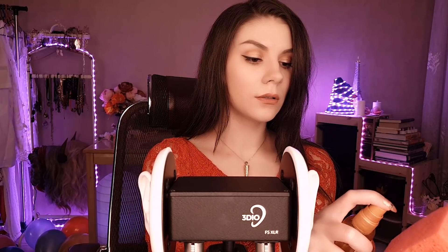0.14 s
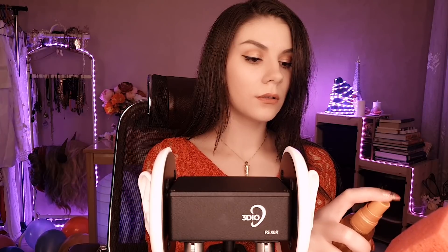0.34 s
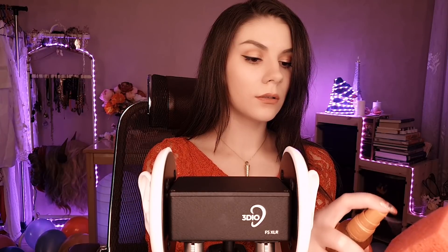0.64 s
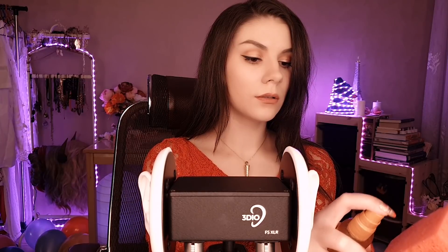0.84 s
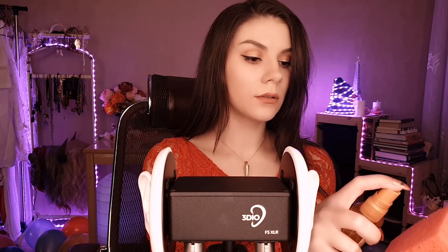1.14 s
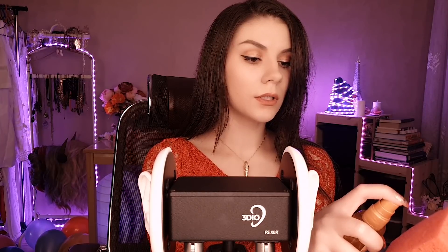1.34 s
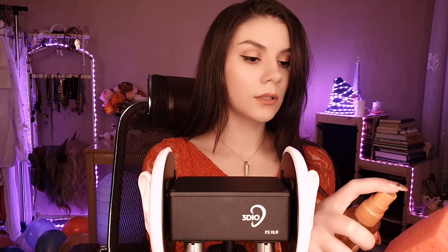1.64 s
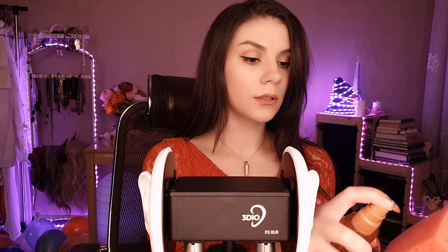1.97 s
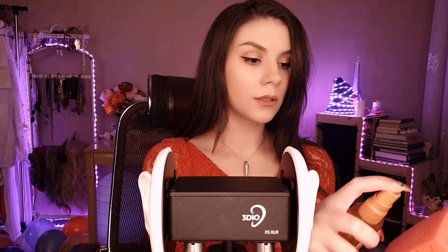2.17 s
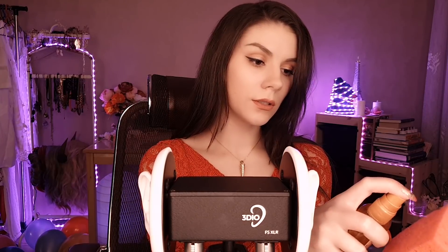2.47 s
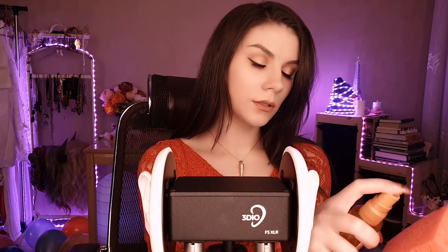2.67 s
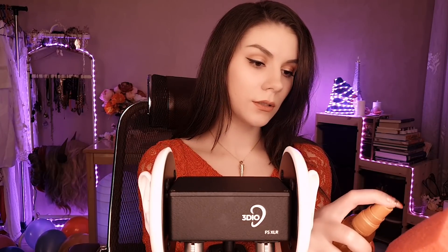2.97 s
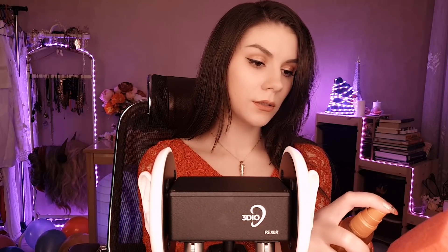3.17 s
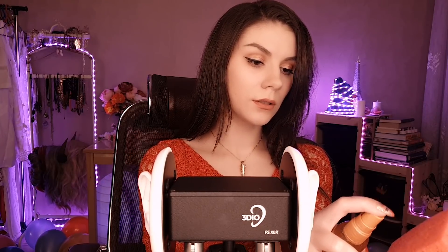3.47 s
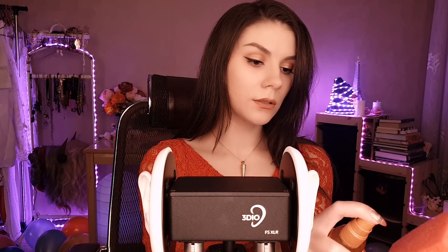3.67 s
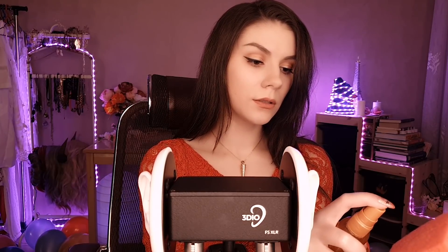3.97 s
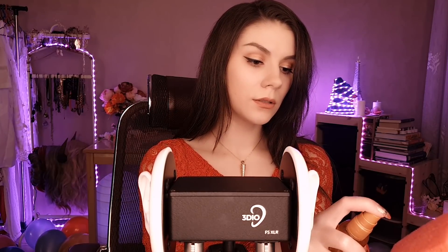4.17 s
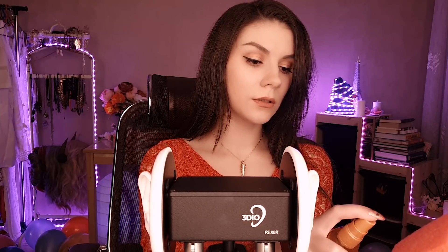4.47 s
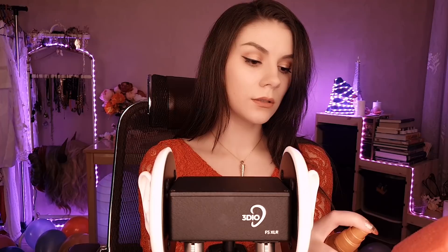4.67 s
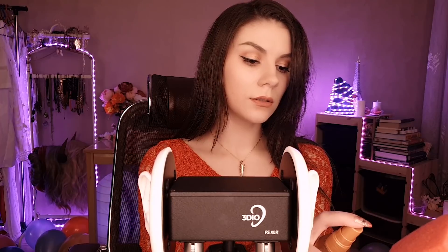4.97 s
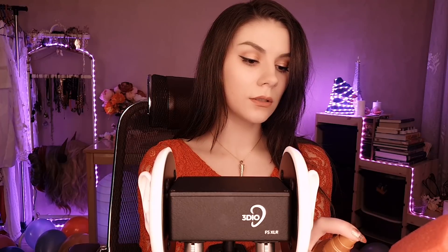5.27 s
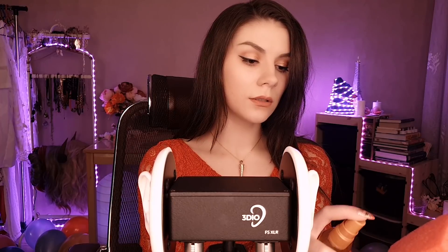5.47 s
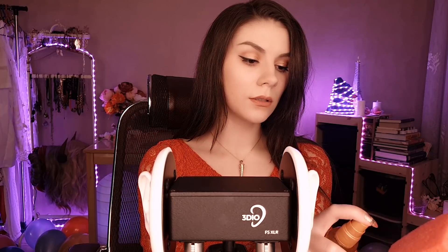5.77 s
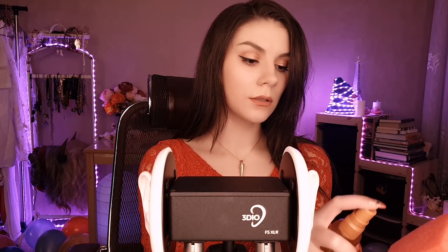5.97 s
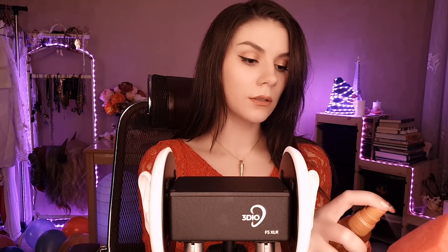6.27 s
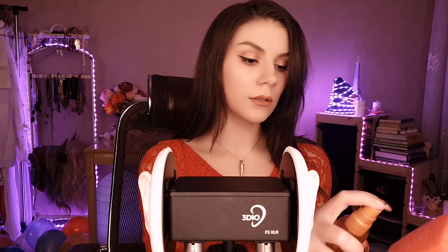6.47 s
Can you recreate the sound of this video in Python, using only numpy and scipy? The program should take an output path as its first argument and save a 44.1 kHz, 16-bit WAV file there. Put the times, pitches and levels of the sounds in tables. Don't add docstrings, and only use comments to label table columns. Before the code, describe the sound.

A small plastic pump sprayer is pressed twelve times, very close to the right ear of a binaural microphone. Each press gives a soft thud and a short bright hiss, then a rising wet squelch as the pump refills, usually ending in a hollow knock. Small clicks and creaks fill the gaps. The left ear gets it fainter and duller, over low house rumble and hum in a furnished room.

```python
import sys
import numpy as np
from scipy import signal
from scipy.fft import rfft, irfft, next_fast_len
from scipy.io import wavfile
from scipy.ndimage import uniform_filter1d, map_coordinates

SR = 44100
rng = np.random.default_rng(int(sys.argv[2]) if len(sys.argv) > 2 else 0)


def decibels_to_gain(level_db):
    exponent = np.asarray(level_db, float) / 20
    return 10 ** exponent


def log_audio(samples):
    frames = np.atleast_2d(samples).T
    limited = np.clip(frames, -1, 1)
    pcm = np.round(limited * 32767).astype(np.int16)
    wavfile.write(sys.argv[1], SR, pcm)


N = 291942


def unit(x):
    return x / np.sqrt(np.mean(x ** 2) + 1e-20)


def along(points, hz):
    point_hz, value = np.transpose(points)
    return np.interp(np.log(hz + 1), np.log(point_hz + 1), value)


def envelopes(tables):
    t = np.arange(N) / SR
    s, db, *others = np.transpose(np.vstack(tables))
    gate = sum((t > rows[0][0]) & (t < rows[-1][0]) for rows in tables)
    gain = uniform_filter1d(1. * gate, size=60) * decibels_to_gain(np.interp(t, s, db))
    return [gain] + [np.interp(t, s, column) for column in others]


def wobble(rate):
    knots = rng.standard_normal(int(N * 1000 / SR) + 4)
    return map_coordinates(knots, [np.arange(N) * rate / SR])


def filtered(x, response):
    m = next_fast_len(N + 8192)
    return irfft(rfft(x, m) * response(np.fft.rfftfreq(m, 1 / SR)), m)[..., :N]


def hiss(spectrum):
    return unit(filtered(rng.standard_normal(N), lambda hz: decibels_to_gain(along(spectrum, hz))))


def strike(out, s, db, modes, attack_s, detune):
    longest_s = max(t60 for _, _, t60 in modes)
    t = np.arange(round(SR * min(1 / 3, 1.5 * longest_s))) / SR
    luck = rng.standard_normal((len(modes), 2)) * [1.8, min(detune, .045)]
    ring = np.zeros(len(t))
    for (hz, level_db, t60), (extra_db, off_pitch) in zip(modes, luck):
        fade = decibels_to_gain(level_db + extra_db - 60 * t / t60)
        ring += fade * np.sin(2 * np.pi * hz * (1 + off_pitch) * t)
    out[round(s * SR):][:len(t)] -= decibels_to_gain(db) * ring * (1 - np.exp(-2 * t / attack_s)) ** 2


def chamber(hz, width_hz):
    slow = filtered(rng.standard_normal((2, N)), lambda f: 1 / (1 + (f / width_hz) ** 2))
    turn = 2 * np.pi * np.cumsum(hz) / SR
    return unit(slow[0] * np.cos(turn) + slow[1] * np.sin(turn))


# valve_opens_s, length_s, jet_db, give_way_thud_db, bottoming_thud_db
DOWNSTROKES = [(0.076, .055, -31.5, -35.5, -36), (0.645, 0.051, -31.5, -34, -31.5),
               (1.247, .05, -31.5, -36, -36), (1.842, 0.053, -31.5, -28.5, -30),
               (2.421, 0.049, -32, -34.5, -35), (2.991, 0.051, -32, -30.5, -34.5),
               (3.536, .05, -31, -30, -30), (4.061, 0.051, -33.5, -34.5, -35),
               (4.601, 0.05, -33.5, -33, -34.5), (5.156, 0.048, -32.5, -31.5, -30.5),
               (5.696, 0.051, -33, -31, -34), (6.252, 0.047, -32.5, -34.5, -34.5)]
# pitch_hz, level_db (per Hz)
MIST_COLOUR = [(180, -29), (300, -20.5), (842, -17), (1390, -13.5), (2070, -3.5), (2520, -7), (3080, -8),
               (3580, -6), (4830, -1.5), (6620, -8), (8640, -15), (10700, -12.5), (13800, -22),
               (15000, -23), (16000, -29)]


def jet():
    attack_s, release_s = 0.0031, 0.0058
    from_db, swell_db, to_db = -8.5, 1.5, -10.5
    gain, = envelopes([[(s, db + from_db), (s + attack_s, db - swell_db), (s + long, db),
                        (s + long + release_s, db + to_db)] for s, long, db, *_ in DOWNSTROKES])
    flutter = decibels_to_gain(.6 * wobble(300))
    return decibels_to_gain(5.5) * gain * unit(flutter * hiss(MIST_COLOUR))


def bleed():
    start_db, length_s, fade_db, top_hz = -24, 0.23, -20, 8000
    gain, = envelopes([[(s + long, db + start_db), (s + long + length_s, db + start_db + fade_db)]
                       for s, long, db, *_ in DOWNSTROKES])
    return decibels_to_gain(5.5) * gain * filtered(hiss(MIST_COLOUR), lambda hz: 1 / (1 + (hz / top_hz) ** 2))


# start_s, length_s, loudest_after_s, level_db, last_chamber_hz
RETURNS = [(0.29, 0.065, 0.031, -39, 3250), (0.86, 0.05, 0.054, -35.5, 3000),
           (1.469, 0.071, 0.038, -39.5, 3000), (2.066, 0.083, 0.026, -41.5, 2650),
           (2.641, 0.058, 0.03, -38, 3200), (3.204, 0.07, .035, -41.5, 2800),
           (3.745, 0.062, 0.043, -38.5, 3300), (4.274, 0.062, 0.032, -41, 3100),
           (4.806, .068, 0.041, -42, 3100), (5.358, 0.059, 0.037, -37.5, 3250),
           (5.9, 0.059, .036, -40.5, 3100), (6.463, 0.069, 0.04, -42, 2900)]
# pitch_hz, level_db (per Hz)
FIZZ_COLOUR = [(300, -24.5), (900, -0.5), (1300, -8.5), (2000, 4.5), (3700, -20.5), (5000, 2),
               (6500, -10.5), (8300, -24.5), (10000, -12.5), (12000, -30.5), (16000, -35)]


def suction():
    empty_hz, attack_s, from_db = 2180, .008, -39
    rise_db_per_s, fade_db_per_s = 193, 399
    fizz_db, fizz_follows = -4.5, 0.73
    tables = []
    hz = np.full(N, 1. * empty_hz)
    for s, long, top, db, last_hz in RETURNS:
        shape = [(-attack_s, from_db), (0, -rise_db_per_s * top), (top, 0),
                 (long, -fade_db_per_s * (long - top))]
        tables.append([(s + after_s, db + swell, swell) for after_s, swell in shape])
        a, b = round((s - attack_s) * SR), round((s + long) * SR)
        hz[a:b] += (last_hz - empty_hz) * np.linspace(0, 1, b - a) ** 2.0
    gain, swell_db = envelopes(tables)
    gurgle = wobble(260)
    wide = .3 * decibels_to_gain(2 * gurgle) * chamber(hz, width_hz=400)
    core = unit(decibels_to_gain(2.2 * gurgle) * (chamber(hz, width_hz=160) + wide))
    fizz = unit(decibels_to_gain(1.5 * gurgle + 2.5 * wobble(400)) * hiss(FIZZ_COLOUR))
    fizz_gain = decibels_to_gain(fizz_db + (fizz_follows - 1) * np.maximum(swell_db, -15))
    return decibels_to_gain(2) * gain * (core + fizz_gain * fizz)


OPENING_SLUGS = [-45, -29.5, -35.5, -30, -35.5, -37, -34.5, -38.5, -39, -43, -56, -37.5]
# start_s, peak_db, bubble_db (above the peak)
LATER_SLUGS = [(0.296, -31.5, -24), (0.3069, -33.5, -14), (0.3208, -36, -12), (0.337, -31.5, -7.5),
               (0.8753, -24.5, -13.5), (0.8878, -29.5, -10.5), (1.487, -31, -13), (2.0826, -28.5, -12),
               (2.098, -39, -13), (2.6577, -29.5, -10.5), (2.6804, -25.5, -11), (3.22, -31, -11),
               (3.264, -43, -4.5), (3.761, -28, -13), (4.298, -45, -4), (4.8183, -41, -25),
               (5.3708, -45, -5), (5.913, -39, -15), (6.4808, -33.5, -8)]
# pitch_hz, level_db, t60_s
BUBBLE_MODES = [(1010, 5, 0.014), (780, -11.5, 0.04)]
# pitch_hz, level_db, t60_s
BALL_MODES = [(4340, 3.5, 0.0029), (5200, -2, 0.0084), (5960, -10, 0.0041), (7900, -10, 0.0021),
              (9800, -20, 0.0016)]


def slugs():
    first_lag_s, first_bubble_db, ball_db = 0.0015, -31.5, 5
    swell, out, t = np.zeros(N), np.zeros(N + SR), np.arange(-200, 200) / SR
    first = [(s + first_lag_s, db, first_bubble_db) for (s, *_), db in zip(RETURNS, OPENING_SLUGS)]
    for s, db, bubble_db in first + list(LATER_SLUGS):
        i = round((s + 0.0016) * SR)
        swell[i - 200:i + 200] += decibels_to_gain(db) * np.exp(-.5 * (t / .0013) ** 2)
        strike(out, s + 0.0011, db + bubble_db + 11.5, BUBBLE_MODES, attack_s=0.002, detune=0.051)
        wet_ball = np.array(BALL_MODES) * [1, 1, .7]
        strike(out, s, db + ball_db, wet_ball, attack_s=0.0015, detune=0.045)
    return decibels_to_gain(-3.0) * swell * hiss(FIZZ_COLOUR) + out[:N]


# start_s, thud_db, thud_hz, slip_db
FINGER_LANDINGS = [(0.562, -29, 126.7, -58), (1.115, -38.5, 137, -60), (1.749, -35.5, 162, -64.5),
                   (2.329, -47, 117, -66), (2.935, -28, 130, -52), (3.441, -37, 129, -61),
                   (3.975, -37.5, 127, -65), (4.516, -40, 119.4, -64.5), (5.081, -39, 148.6, -62.5),
                   (5.612, -34, 123.3, -63), (6.183, -31.5, 122.5, -60.5)]
SLIP_LEAD_S = 0.0051


def finger():
    attack_s, release_s, edge_db, fizz_db = 0.015, 0.025, -35, -3.5
    tables = []
    for s, _, _, db in FINGER_LANDINGS:
        touch_s = s - SLIP_LEAD_S
        tables.append([(touch_s - attack_s, db + edge_db), (touch_s, db), (touch_s + release_s, db + edge_db)])
    gain, = envelopes(tables)
    shell = chamber(np.full(N, 2400.), width_hz=400)
    jerks = unit(decibels_to_gain(4.5 * wobble(350)))
    return decibels_to_gain(10.5) * gain * jerks * (shell + decibels_to_gain(fizz_db) * hiss(FIZZ_COLOUR))


# pitch_hz, level_db (per Hz)
CREEP_COLOUR = [(200, -18), (600, 3), (2500, -8), (3500, -10.5), (6000, -18), (12000, -28), (16000, -55)]


def slack():
    t = np.arange(N) / SR
    creep = sum(np.clip(1 + (t - s) / 0.018, 0, 1) * (t < s + .003) for s, *_ in DOWNSTROKES)
    return decibels_to_gain(-54.0 + 6.2 * wobble(300)) * creep * hiss(CREEP_COLOUR)


# start_s, peak_db, click_db (above the peak), ring_length (for this grip, 0-2)
TOP_KNOCKS = [(0.339, -28.5, -5, 0.86), (0.904, -29, -3, 0.58), (1.529, -33, -5, 0.77),
              (2.685, -27.5, -2.5, 0.71), (3.275, -41, -28, 0.22), (3.798, -31, -2.5, 0.77),
              (4.326, -36, -4, 0.71), (4.873, -37.5, -8.5, 0.69), (5.406, -30.5, -4, 0.72),
              (5.955, -32, -5.5, 0.61), (6.526, -38, -18, 0.62)]
# start_s, peak_db
BALL_RESEATS = [
    (0.3682, -25),
    (0.934, -28.5),
    (1.5544, -38),
    (2.7147, -28),
    (3.827, -30),
    (5.4341, -34),
    (5.9806, -32.5),
]
# start_s, peak_db
SPRING_TICKS = [(0.4524, -65), (0.5297, -68), (0.5414, -47), (0.9834, -69), (0.9934, -68), (1.056, -56),
                (1.1687, -60), (1.1844, -66), (1.2024, -70), (1.657, -58), (1.736, -41), (1.758, -44),
                (2.3096, -55), (2.71, -47.5), (2.379, -48), (2.7714, -62), (2.7867, -47), (3.4594, -57),
                (3.942, -72.5), (5.0374, -74), (5.689, -65), (6.1145, -47)]
# start_s, peak_db, shell_db, body_db (both above the peak)
PLASTIC_CREAKS = [(0.2511, -51.5, 8, 6.5), (1.0694, -98, 5.5, -24), (1.224, -56, 0, 6),
                  (2.14, -37.5, -1, 1.5), (2.946, -45, -1, -3), (2.9517, -37.5, 18.5, 16.5),
                  (2.9751, -33.5, 14, 14.5), (3.493, -59, -2, -3), (4.534, -63.5, 17, 2),
                  (4.5884, -52, 11.5, -19.5), (5.148, -56, 18, 8), (5.3717, -38, 5, 2),
                  (5.4694, -51.5, 14, 8.5), (5.9277, -38.5, 15, 8.5), (6.0174, -49, 11, 5),
                  (1.752, -58, 2, 16), (6.1489, -64, -8, -3), (6.239, -56, 5, 6)]
# start_s, thud_db, thud_hz
GRIP_SHIFTS = [(0.002, -45, 117), (0.249, -40, 143), (0.81, -51.5, 158), (2.064, -48, 123),
               (2.115, -55, 121), (2.153, -47, 147), (2.26, -51, 130), (2.769, -47, 120), (2.86, -58, 125),
               (3.202, -59, 149), (3.277, -47.5, 227), (3.744, -49, 159)]
# pitch_hz, level_db, t60_s
STOP_MODES = [(129, 5, 0.17), (122.2, -9, 0.71), (139.4, -27, 1), (158.4, -2, 0.15), (186.4, -16, 0.43),
              (220.3, -15.5, 0.3), (637, -9.5, 0.076)]
# pitch (multiple of the thud), level_db, t60_s
FLESH_MODES = [(0.55, -12, 0.027), (1, 7, 0.042), (1.5, -16.5, 0.2), (5.5, -6.5, 0.02)]
# pitch_hz, level_db, t60_s
SHELL_MODES = [(1340, -4, 0.0036), (1627, -4, 0.016), (1800, 7.5, 0.0045), (2233, 2, 0.0096),
               (2583, -5, 0.0032), (3200, -8, 0.018)]
# pitch_hz, level_db, t60_s
BODY_MODES = [(426, 12.5, 0.0023), (717, -1.5, 0.021), (836, -8.5, 0.0079), (1090, -2.5, 0.0099)]


def blows():
    out = np.zeros(N + SR)
    for s, db, click_db, loose in TOP_KNOCKS:
        gripped = np.array(STOP_MODES) * [1, 1, loose]
        strike(out, s + 0.00221, db + 5.5, gripped, attack_s=0.004, detune=0.022)
        strike(out, s + 0.002512, db + click_db + 12.0, SHELL_MODES, attack_s=0.0011, detune=0.068)
        strike(out, s + 0.002515, db + click_db - 7.5 + 11.0, BODY_MODES, attack_s=0.00022, detune=0.017)

    give_hz, give_lead_s = 110.8, 0.00189
    bottom_hz, bottom_lag_s = 96, .0015
    pushes = [(s - give_lead_s, db, give_hz) for s, _, _, db, _ in DOWNSTROKES]
    pushes += [(s + long + bottom_lag_s, db, bottom_hz) for s, long, *_, db in DOWNSTROKES]
    pushes += [row[:3] for row in FINGER_LANDINGS]
    pushes += list(GRIP_SHIFTS)
    pushes += [(s, db - 15.5, 125) for s, db in BALL_RESEATS]
    for s, db, hz in pushes:
        thud = np.array(FLESH_MODES) * [hz, 1, 1]
        strike(out, s + 0.0012, db + 6, thud, attack_s=0.0046, detune=0.1)

    thin_shell_db, thin_body_db = -11.5, -13.5
    snaps = [(s, db, thin_shell_db, thin_body_db) for s, db in list(BALL_RESEATS) + list(SPRING_TICKS)]
    snaps += list(PLASTIC_CREAKS)
    snaps += [(s - SLIP_LEAD_S, db + 10.5, 3, 0) for s, _, _, db in FINGER_LANDINGS]
    for s, db, shell_db, body_db in snaps:
        strike(out, s + 0.00087, db + 3, BALL_MODES, attack_s=0.00051, detune=0.11)
        strike(out, s + .0006, db + shell_db - 0.5, SHELL_MODES, attack_s=0.00082, detune=0.051)
        strike(out, s + .0006, db + body_db + 3.0, BODY_MODES, attack_s=0.0007, detune=0.054)
    return out[:N]


# pitch_hz, t60_s
ROOM_RING = [(100, 0.17), (500, 0.33), (2000, 0.32), (6000, 0.38), (14000, 0.28)]
# pitch_hz, level_db
ROOM_COLOUR = [(60, -7), (125, 9.5), (300, -3.5), (800, 1.5), (2000, 0), (3500, 0), (6000, -2.5),
               (14000, -6.5)]


def room(x):
    step = SR // 4
    out = np.zeros((2, N + 2 * SR))
    for i in range(0, N, step):
        hz, t, z = signal.stft(rng.standard_normal((2, SR // 2)), SR, nperseg=256)
        decay_db = along(ROOM_COLOUR, hz)[:, None] - 60 * t / along(ROOM_RING, hz)[:, None]
        tail = signal.istft(z * decibels_to_gain(decay_db), SR, nperseg=256)[1]
        wet = signal.fftconvolve(x[None, i:i + step], tail / np.linalg.norm(tail[0]), axes=1)
        out[:, i + 250:][:, :wet.shape[1]] += wet
    return out[:, :N]


# pitch_hz, level_db (per Hz)
AIR_COLOUR = [(18, -47.5), (30, -5), (64, -27), (97, -4), (142, -2), (309, -11.5), (407, -24), (485, -22.5),
              (863, -31), (954, -29.5), (1140, -32), (1390, -31.5), (6570, -39.5), (12000, -45.5),
              (15600, -74.5), (22000, -120)]
# pitch_hz, likeness (0-1)
EAR_LIKENESS = [(60, 1), (240, 0.68), (950, 0.073), (3770, 0.036), (15000, 0.073)]


def air():
    white = rng.standard_normal((2, N))
    bass = filtered(white, lambda hz: 1 / (1 + (hz / 400) ** 4))
    pair = white + bass * (decibels_to_gain(1.63 * wobble(10) + 0.9 * wobble(1.66)) - 1)

    def spread(hz):
        turn = np.arccos(np.clip(along(EAR_LIKENESS, hz), -1, 1)) / 2
        return decibels_to_gain(along(AIR_COLOUR, hz)) * (hz < 12150) * [np.cos(turn), np.sin(turn)]

    mid, side = filtered(pair, spread)
    return decibels_to_gain(-57) * unit(np.array([mid + side, mid - side]))


def mains():
    hum_db, throb_db = -53, -58
    phase = 2 * np.pi * 50 * np.arange(N) / SR + 1.1 * wobble(9)
    hum = decibels_to_gain(hum_db + 0.87 * wobble(1.2)) * np.sin(phase)
    throb = unit(filtered(rng.standard_normal((2, N)), lambda hz: np.exp(-((hz - 50) / 9) ** 2)))
    return hum + decibels_to_gain(throb_db) * (throb + 0.4 * throb[::-1])


# time_s, outer_ear_ring_db, far_ear_gain_db
NOZZLE_TURN = [
    (0, 0.5, 8),
    (1.2, -6.5, 6),
    (2.6, -4, 6.5),
    (3.3, -1, 6.5),
    (4.6, 4, 7),
    (5.4, 1, 8),
    (6.601, 3, 6.5),
]
# pitch_hz, level_db
HEAD_SHADOW = [(60, -18.5), (200, -11), (700, -23), (1300, -19), (2400, -23), (3200, -15), (4600, -26.5),
               (8000, -26), (15000, -47)]


def scene():
    pinna_hz, pinna_width_hz, ear_lag = 9830, 830, 29
    s, ring_db, far_db = np.transpose(NOZZLE_TURN)
    t = np.arange(N) / SR
    spray = jet() + bleed()
    pump = slack() + suction() + slugs() + finger() + blows()
    ring = filtered(spray + pump, lambda hz: np.exp(-((hz - pinna_hz) / pinna_width_hz) ** 2))
    near = spray + pump + (decibels_to_gain(np.interp(t, s, ring_db)) - 1) * ring
    far = filtered(near, lambda hz: decibels_to_gain(along(HEAD_SHADOW, hz)) * np.exp(-2j * np.pi * hz * ear_lag / SR))
    ears = np.array([decibels_to_gain(np.interp(t, s, far_db)) * far, near])
    echoes = decibels_to_gain(-19.5) * room(near + (decibels_to_gain(-2.0) - 1) * pump)
    return ears + echoes + air() + mains()


def band_limit(x):
    return signal.sosfilt(signal.butter(12, 16640, fs=SR, output="sos"), x)


def record(dry):
    top_hz, edge_hz = 15950, 40

    def response(hz):
        bass_cut = -hz ** 2 / (13.0 ** 2 - hz ** 2 + 1.3j * 62.3 * hz)
        return bass_cut ** 2 * (1 - np.tanh((hz - top_hz) / edge_hz)) / 2

    mix = filtered(dry, response)
    return band_limit(mix)


dry = scene()
out = record(dry)
log_audio(out)
```